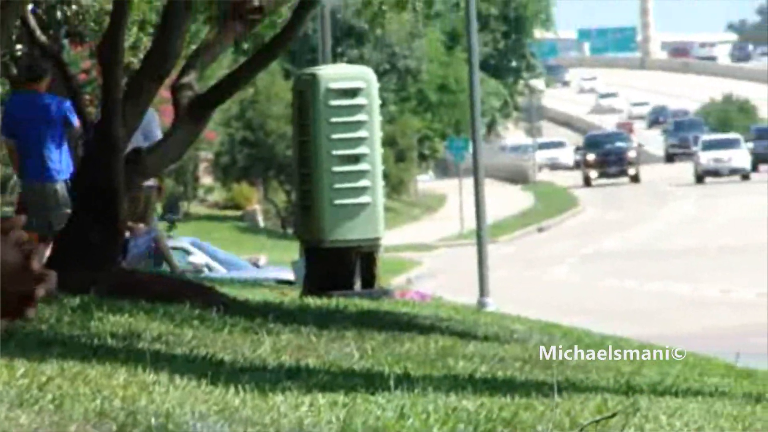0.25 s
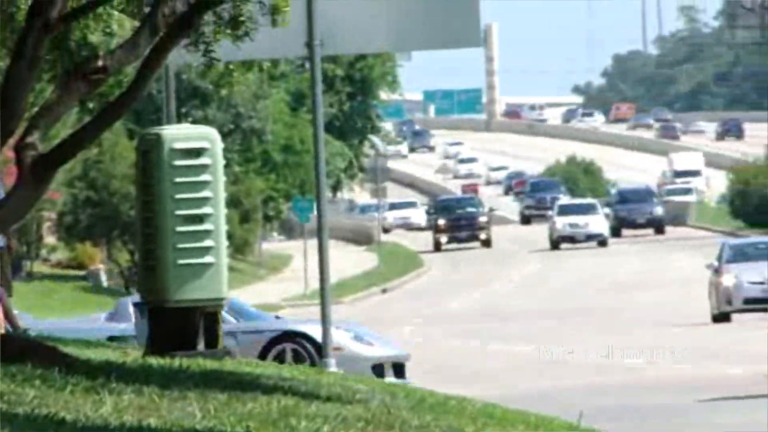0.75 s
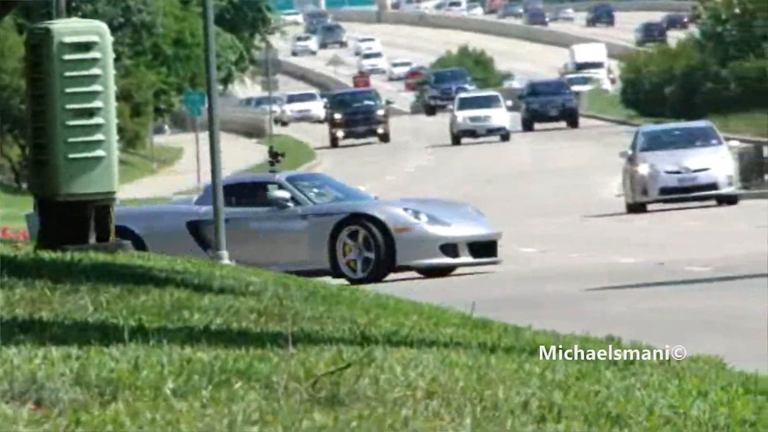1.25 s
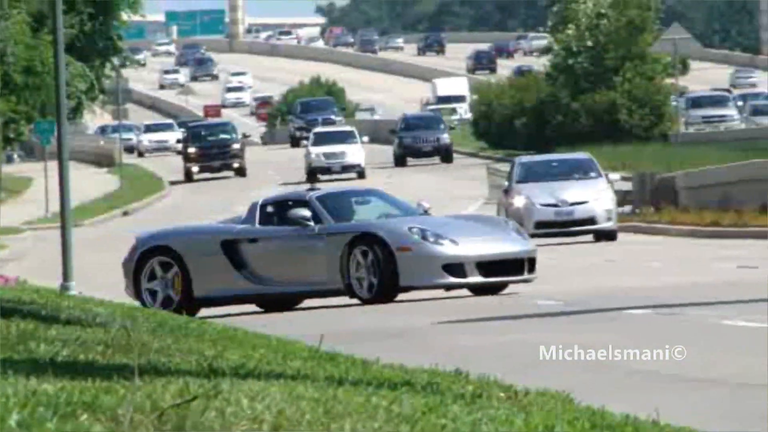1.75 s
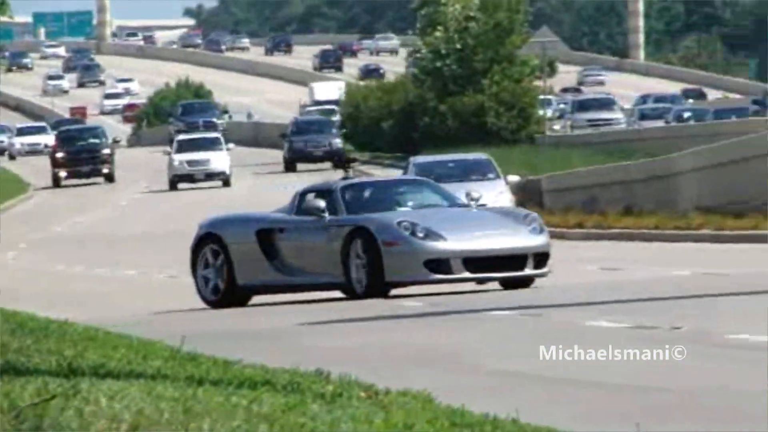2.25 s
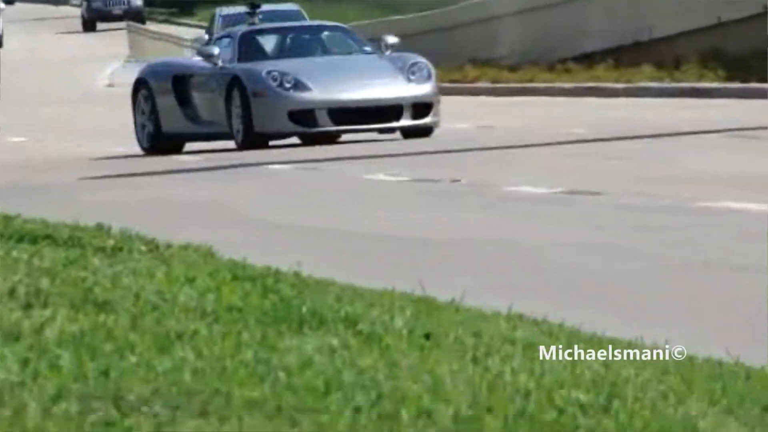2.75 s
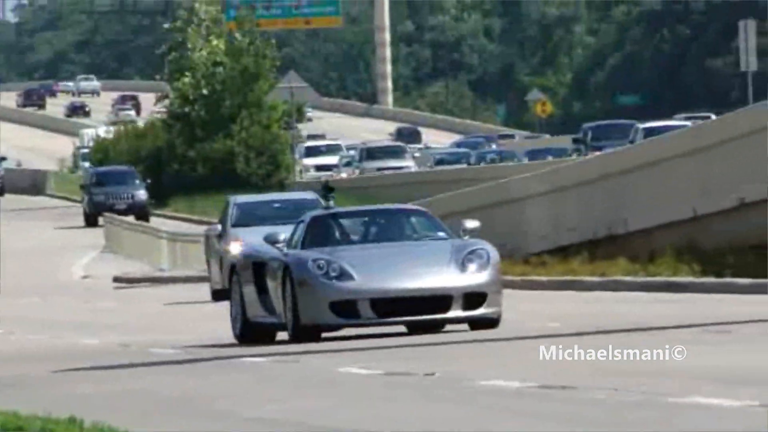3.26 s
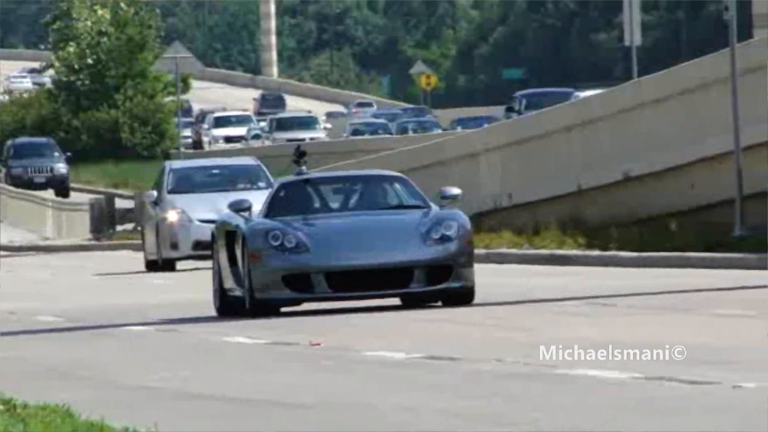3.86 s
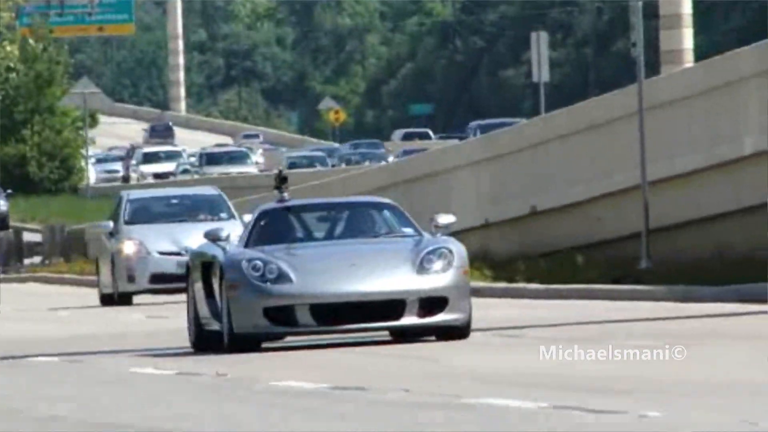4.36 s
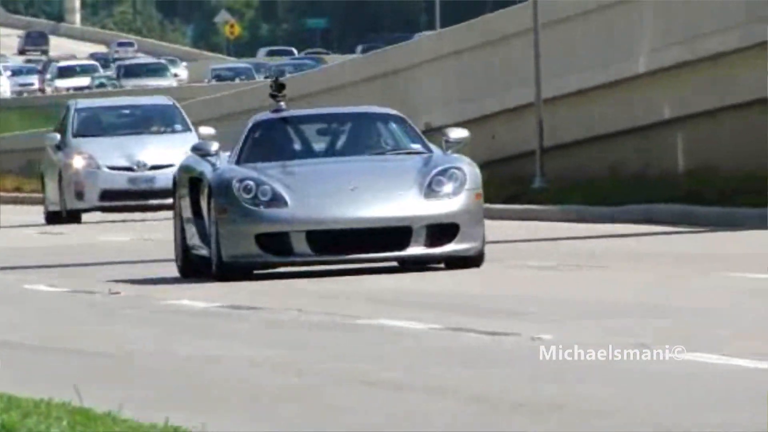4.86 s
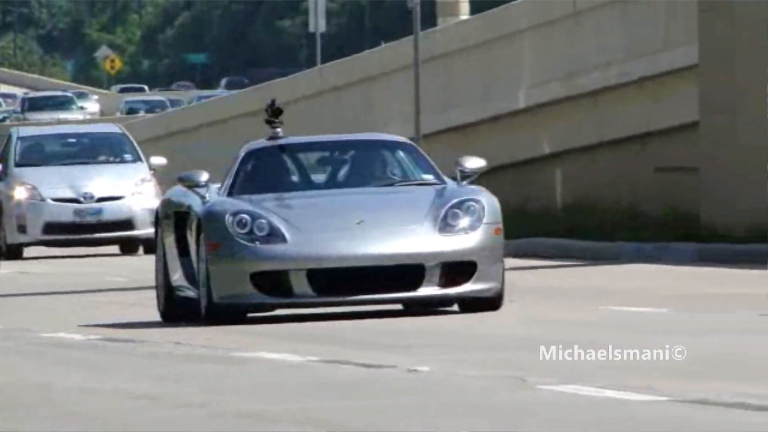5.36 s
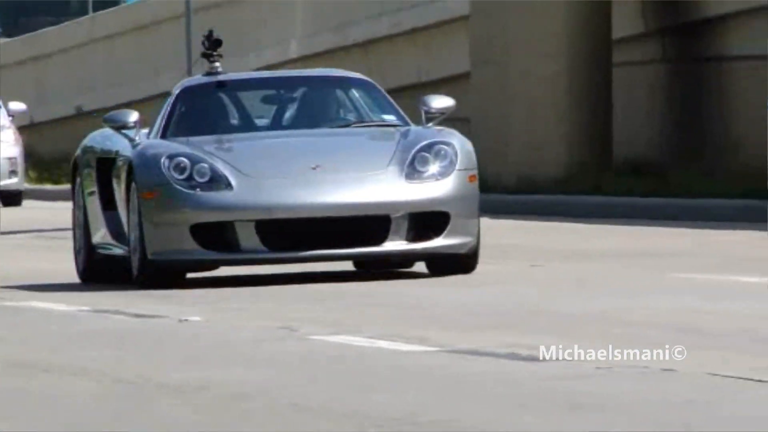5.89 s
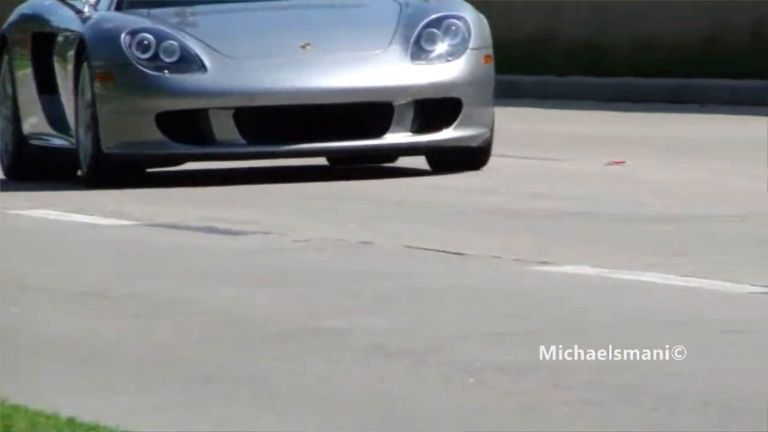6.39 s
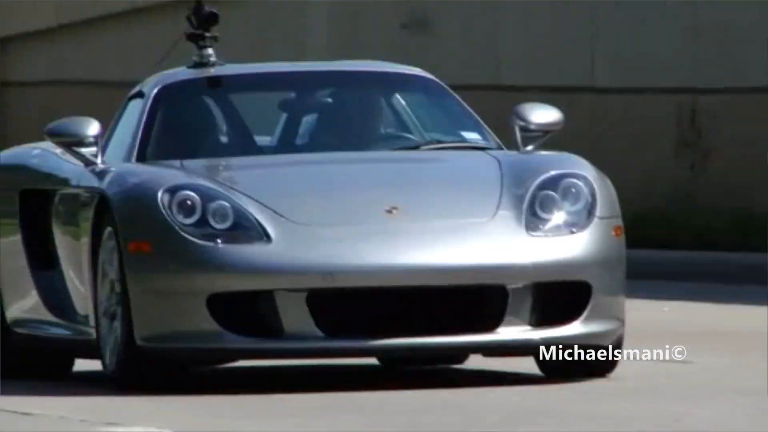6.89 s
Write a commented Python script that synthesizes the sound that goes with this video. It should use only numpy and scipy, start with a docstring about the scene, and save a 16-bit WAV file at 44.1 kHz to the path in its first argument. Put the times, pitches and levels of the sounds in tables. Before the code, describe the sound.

Busy roadside traffic hisses and swells under buffeting wind on a small camera microphone, then a sports car's engine climbs past and shifts up.

```python
"""On the grass verge of a busy road, heard through a small two-port camera microphone. Cars sweep by in swells
of shaped noise: tyre roar, sizzle and hiss. A sports car comes in as climbing sine tones and shifts up once; two
treaded tyres sing as tones mixed with narrow noise, and brief tones swell and fade. Wind is lumpy low noise and
short thumps that push the two sides in opposite directions. A small snap rings once, and a small motor whines."""
import sys
import numpy as np
from scipy import signal
from scipy.fft import rfft, irfft, next_fast_len
from scipy.io import wavfile
from scipy.ndimage import uniform_filter1d, map_coordinates

SR = 44100
rng = np.random.default_rng(int(sys.argv[2]) if len(sys.argv) > 2 else 0)


def output_pcm(signal):
    """Save a mono or channel-first signal as 16-bit PCM at the path in sys.argv[1].

    Samples are clipped to [-1, 1] before scaling.
    """
    pcm = np.clip(np.atleast_2d(signal).T, -1, 1) * 32767
    wavfile.write(sys.argv[1], SR, np.round(pcm).astype(np.int16))


N = 314433
T = np.arange(N) / SR  # time of each sample, seconds
HZ, FRAME_S, _ = signal.stft(T, SR, nperseg=512)  # pitch of each band, time of each short frame

# Passing traffic. Each row: time in seconds, tyre roar in dB, hiss above the roar in dB.
ROAD = [(0, -27.5, -18), (.15, -26, -18), (.23, -22, -19.5), (.37, -22, -17), (.5, -20.5, -17.5),
        (.9, -19, -22), (1.15, -20, -18.5), (1.275, -22, -16.5), (1.32, -29.5, -14), (1.4, -27.5, -16.5),
        (1.52, -29.5, -17.5), (1.68, -30, -21.5), (1.9, -26.5, -20.5), (2.03, -27.5, -22.5),
        (2.27, -35, -21.5), (2.63, -29, -22), (3.0, -23, -20), (3.07, -25, -21.5), (3.12, -29.5, -17),
        (3.25, -31.5, -20.5), (3.52, -25, -18.5), (3.78, -30, -17.5), (4.0, -30.5, -19), (4.3, -29, -15.5),
        (4.5, -25.5, -13), (4.63, -28.5, -11.5), (4.75, -25.5, -14.5), (4.88, -28.5, -10), (5.1, -25, -20),
        (5.27, -27.5, -16.5), (5.6, -25, -19), (5.75, -21, -22.5), (5.88, -24, -18.5), (6.15, -21.5, -22.5),
        (6.45, -23.5, -21), (6.72, -19, -21.5), (7.13, -20.5, -22)]
# Tone colours of the road layers, evened out to a common strength. Each row: pitch in Hz, relative dB per Hz.
DRONE_COLOUR = [(25, -49), (60, -54), (110, -10.5), (200, 6), (350, 0.5), (550, 2.5), (800, -3),
                (1200, -81)]
ROAR_COLOUR = [(250, -62), (500, -32), (700, 0.5), (1000, 1.5), (1300, 2.5), (1700, -2.5), (2200, -10),
               (3000, -65)]
UPPER_ROAR_COLOUR = [(1100, -39), (1350, 9), (1600, 2), (1850, 1.5), (2300, -35)]
GROOVE_COLOUR = [(700, -16), (820, -8), (930, 9), (1060, 13), (1200, -22), (1400, -49)]  # air in the tyre grooves resonates
SIZZLE_COLOUR = [(1200, -61), (1700, -2.5), (2100, -3.5), (2500, -3), (2900, -6), (3600, -10),
                 (4300, -18.5), (5500, -52)]
HISS_COLOUR = [(3000, -43), (3900, -5.5), (4400, -2.5), (5500, -5), (7000, -9.5), (9000, -13), (10800, -15),
               (11700, -20.5), (12300, -44)]
# Layer levels over time. Each row: time in seconds, level in dB above the roar.
GROOVE_SHARE = [(0, -1), (.2, -1), (.4, -6), (.7, -6.5), (1, -6), (1.3, -3.5), (2.4, -6), (4, -2.5),
                (4.5, -9), (5.1, -19), (6, -19), (6.5, -6), (7.13, -24)]
UPPER_SHARE = [(0, -6), (1.3, -14), (4.6, -32), (5.15, -5.5), (5.8, -5), (6.2, -12), (7.13, -9)]
SIZZLE_SHARE = [(0, -7.5), (1.3, -9.5), (2.4, -9), (3.7, -7), (4.6, -5), (4.9, -7.5), (5.2, -4.5),
                (5.75, -4), (6.2, -8), (7.13, -7.5)]  # as it is at the usual hiss
# Where most of the road noise comes from. Each row: time in seconds, bearing from 0 (ahead) to 1 (right).
BEARING = [(0, 0.49), (.5, 0.54), (.8, 0.92), (1.35, 0.5), (2.4, 0.28), (3.4, 0.38), (5.1, 0.39), (6, 0.79),
           (6.4, 0.74), (7.13, 0.61)]
# Likeness of the two sides of the road noise; the treble is nearly mono.
# Each row: pitch in Hz, likeness from 0 to 1.
ALIKE = [(80, 0.1), (260, 0.9), (700, 0.75), (1200, 0.5), (2500, 0.34), (3600, 0.47), (4300, 0.88),
         (7000, 0.89), (11000, 0.97)]
# Phase by which the right side leads the left for sound fully from the right; almost none in the treble.
# Each row: pitch in Hz, phase in radians.
LEAD = [(60, .3), (300, 0.2), (800, 1.28), (1500, 2.18), (3100, 3.77), (3700, 3.3), (4300, .1),
        (12000, .01)]
# For sound fully from the right. Each row: pitch in Hz, left minus right level in dB.
SHADE = [(100, -5), (400, 2), (600, -4.5), (1200, -1.5), (2500, -7.5), (3700, -5), (4500, -1), (8000, -0.7)]
USUAL_ROAR_DB, USUAL_HISS_DB = -26, -19.5  # levels about which the growth rules turn
DRONE_DB, DRONE_GROWS = -32.5, 0.82  # engine drone at the usual roar; dB gained per dB of roar
SIZZLE_GROWS = 0.45  # dB of sizzle gained per dB of hiss
SURGE_DB, SURGES_PER_S = 0.43, 12  # quick random swells of the whole road
# The grain of the road surface roughens the sound: swing at the usual roar, rate, growth in dB per dB of roar.
RASP_DB, RASPS_PER_S, RASP_GROWS = .55, 110, .6

# Sports car. Each row: time in seconds, firing tone in dB, one-bank tone at half the rate in dB.
ENGINE = [(5.85, -55, -55), (5.97, -31, -48), (6.15, -29.5, -46), (6.27, -31, -48), (6.34, -33, -40),
          (6.4, -32, -30), (6.66, -32, -29), (6.72, -32, -40), (6.8, -29, -38), (6.88, -29, -33),
          (6.9, -48, -30), (7.13, -45, -29)]
FIRING_HZ, CLIMB_HZ_PER_S = 352, 114  # firing rate as the engine comes in, and its climb before the upshift
SHIFT_S, GEAR_STEP = 6.89, .826  # time of the upshift, and the rate after it over the rate before

# Tread blocks of two passing tyres, a list for each. Each row: time in seconds, pitch in Hz, level in dB.
TREADS = [
    [(0, 725, -34), (.15, 720, -35), (.3, 712, -37), (.45, 688, -31), (.6, 662, -32), (.76, 632, -32),
     (.9, 610, -46)],
    [(5.2, 815, -46), (5.4, 806, -34), (5.85, 788, -31), (6.05, 776, -26), (6.15, 770, -25),
     (6.33, 760, -26), (6.55, 751, -33), (6.75, 742, -28.5), (6.9, 732, -32), (7.03, 722, -29),
     (7.07, 730, -33), (7.13, 752, -25)],
]
# One row for each tyre: share of noise from 0 to 1, waver of the line in Hz, flutter of the line in dB.
TREAD_FUZZ = [(.25, 6, 1.2), (.4, 11, 2)]
# Brief tones. Each row: time of the peak in seconds, pitch in Hz, peak in dB, swell length in seconds.
BRIEF_TONES = [(5.503, 1530, -25, 0.037), (5.64, 1320, -20, 0.031), (5.747, 1550, -21, 0.028),
               (5.812, 1690, -20, 0.022), (6.61, 1197, -17.5, 0.031), (6.693, 1316, -25, 0.029),
               (6.854, 1120, -21, .03), (6.898, 1230, -25, .025), (6.96, 1173, -25, 0.026),
               (7.032, 1473, -18.5, 0.026), (7.1, 1300, -21, .03)]

# The snap. Each row: start in seconds, base level in dB.
SNAPS = [(1.8766, -16)]
# Ringing parts. Each row: base pitch in Hz, level above the snap's in dB, time to fall 60 dB in seconds.
SNAP_RING = [(1550, 4, .03), (3050, 20, .011), (3900, 8, .006), (5000, 5, .014), (6000, 5, .009),
             (7400, 5, .01), (9900, -2, .008), (11200, 2, .012)]
# Gain of the snap at each side. Each row, left then right: gain in dB.
SNAP_SIDES_DB = [
    [-11],
    [-2],
]
SNAP_SWELL_S, SNAP_SAG_PER_S = .0014, 40  # build-up time of the ring, and the sag of its pitch factor

# Flutter of air over the port. Each row: time in seconds, level in dB before the gain of each side.
WIND = [(0, -22), (.2, -27), (.5, -29), (.62, -43), (.9, -29), (1.2, -26), (1.3, -18.5), (1.6, -22),
        (1.8, -25.5), (2.15, -23), (3.3, -24), (3.42, -28), (3.6, -22.5), (4.3, -21.5), (4.9, -23),
        (5.3, -22), (5.7, -27.5), (5.95, -25.5), (6.45, -25), (6.72, -27.5), (6.9, -25.5), (7.13, -32)]
# Moments when the flutter falls still. Each row: middle in seconds, half length in seconds.
LULLS = [(0.19, 0.025), (1.236, 0.0083), (1.404, 0.014), (1.546, 0.014), (1.766, 0.046), (2.187, 0.011),
         (3.471, 0.016), (3.825, 0.015)]
# Tone colour of the wind. Each row: pitch in Hz, relative dB per Hz.
BUFFET_COLOUR = [(25, -46), (60, -25.5), (120, -7), (200, -0.5), (300, -0.5), (450, -5.5), (700, -11.5),
                 (1100, -26.5), (2000, -37), (4000, -95.5)]
# The hardest eddies. Each row: peak time in seconds, level in dB before the gain of each side,
# length in milliseconds (stretched after the peak), pitch at the peak in Hz.
THUMPS = [(0.27, -10, 1.7, 350), (0.314, -8, 2.2, 390), (0.39, -11, 1.2, 450), (0.477, -10, 1.2, 500),
          (1.27, -9, 2.8, 410), (1.304, -4, 2.0, 430), (1.319, -8, 2.9, 290), (1.331, -8, 2.8, 350),
          (1.356, -8, 3.6, 420), (1.381, -11, 2.8, 440), (1.432, -8, 2.1, 390), (1.441, -9, 2.3, 400),
          (1.459, -11, 1.8, 410), (1.477, -9, 2.3, 410), (1.506, -11, 1.7, 360), (1.517, -9, 2.5, 360),
          (1.579, -6, 1.5, 330), (1.595, -11, 3.1, 430), (1.607, -9, 1.9, 380), (1.666, -9, 1.9, 450),
          (1.697, -11, 1.8, 380), (1.71, -11, 3.7, 310), (1.871, -11, 3.0, 360), (1.94, -9, 2.6, 370),
          (1.965, -11, 1.2, 500), (2.032, -10, 1.2, 380), (2.043, -6, 1.9, 360), (2.104, -8, 1.4, 430),
          (2.155, -10, 3.3, 350), (2.165, -11, 2.8, 350), (2.202, -10, 1.8, 490), (2.215, -9, 2.6, 330),
          (2.239, -9, 2.5, 460), (2.267, -10, 3.3, 360), (2.303, -11, 2.4, 390), (2.324, -11, 1.5, 440),
          (2.356, -9, 2.2, 320), (2.411, -10, 1.5, 410), (2.427, -10, 2.2, 320), (2.47, -11, 2.5, 280),
          (2.621, -11, 1.2, 600), (2.642, -10, 2.4, 260), (2.665, -10, 1.8, 330), (2.711, -9, 1.2, 420),
          (2.751, -11, 1.8, 270), (2.939, -11, 2.4, 400), (3.047, -10, 2.6, 270), (3.065, -8, 2.1, 330),
          (3.08, -9, 2.7, 300), (3.113, -9, 2.3, 320), (3.132, -7, 1.3, 400), (3.14, -10, 2.7, 330),
          (3.153, -8, 3.0, 330), (3.179, -8, 3.6, 420), (3.242, -8, 3.0, 330), (3.353, -9, 2.8, 300),
          (3.575, -10, 3.4, 370), (3.586, -7, 2.5, 380), (3.632, -8, 2.9, 390), (3.645, -9, 1.9, 460),
          (3.664, -7, 1.9, 360), (3.674, -11, 5.0, 340), (3.703, -5, 2.0, 400), (3.723, -10, 2.9, 370),
          (3.735, -6, 1.2, 420), (3.744, -11, 1.7, 450), (3.764, -9, 3.8, 320), (3.839, -8, 2.9, 360),
          (3.873, -8, 1.7, 660), (3.891, -8, 2.5, 440), (3.919, -6, 1.2, 540), (4.031, -7, 2.0, 360),
          (4.123, -8, 2.5, 370), (4.199, -8, 1.9, 460), (4.24, -11, 2.9, 410), (4.272, -11, 3.0, 330),
          (4.349, -9, 1.9, 380), (4.404, -10, 1.9, 340), (4.477, -9, 1.8, 340), (4.517, -11, 3.3, 630),
          (4.548, -8, 1.7, 600), (4.593, -9, 1.9, 430), (4.603, -10, 1.2, 340), (4.687, -8, 2.4, 420),
          (4.724, -6, 1.5, 420), (4.789, -10, 1.8, 480), (4.833, -8, 2.1, 390), (4.847, -10, 2.5, 310),
          (4.856, -10, 2.7, 380), (4.867, -9, 2.9, 320), (4.918, -10, 1.5, 450), (5.025, -7, 3.8, 490),
          (5.047, -11, 2.2, 340), (5.073, -10, 1.2, 410), (5.181, -5, 1.4, 480), (5.213, -10, 1.9, 480),
          (5.234, -10, 2.4, 480), (5.252, -8, 3.9, 390), (5.313, -10, 1.2, 510), (5.388, -10, 1.3, 540),
          (5.414, -8, 1.4, 500), (5.466, -7, 1.2, 420), (5.522, -11, 1.5, 590), (5.558, -8, 2.4, 330),
          (5.569, -8, 3.3, 490), (5.607, -11, 1.2, 370), (5.661, -9, 1.6, 520), (5.701, -8, 1.9, 430),
          (5.838, -10, 1.2, 370), (5.85, -9, 4.8, 370), (5.867, -10, 1.2, 420), (5.881, -7, 2.6, 340),
          (5.897, -10, 1.7, 350), (6.006, -5, 2.0, 450), (6.02, -8, 1.8, 410), (6.028, -10, 3.3, 370),
          (6.056, -9, 2.4, 370), (6.106, -11, 1.2, 470), (6.239, -8, 2.5, 340), (6.279, -10, 1.2, 460),
          (6.426, -9, 1.5, 370), (6.438, -10, 2.9, 370), (6.466, -10, 1.2, 430), (6.7, -9, 1.2, 510),
          (6.725, -10, 1.5, 500), (6.876, -9, 2.2, 350)]
GUSTY_DB = 2  # random swing of the flutter
STRAY_DB, STRAY_BASS = -11.5, 0.78  # part mostly at the right port: level; power of frequency its gain falls with
YIELD, YIELD_S = .6, .03  # the flutter gives way around a hard eddy: share, span in seconds
SOFT_PER_S, SOFT_DB, SOFT_MS = 10, 4, 2  # softer eddies: rate, middle level above the flutter, base length
EDDY_HZ, SHORTER_IS_HIGHER = 470, 0.36  # their base pitch at 1 ms; power law of pitch against length

# A small motor, perhaps the lens drive. Each row: multiple of the base pitch, level in dB before the run level.
MOTOR = [(1, -48), (2, -39), (3, -47), (6, -55)]
# Run level of the motor. Each row: time in seconds, gain in dB.
MOTOR_RUN = [(0, -16), (2.5, -13), (4.4, -7), (5.3, 0), (7.13, 1)]
MOTOR_HZ = 554.5  # base pitch
TOP_HZ = 12300  # nothing is heard above this


def amp(db):
    """Turn decibels into a plain multiplier."""
    return 10 ** (np.asarray(db) / 20)


def unit(x):
    """Scale to an average strength (root mean square) of 1."""
    return x / np.sqrt(np.mean(np.abs(x) ** 2) + 1e-20)


def along(points, hz):
    """Read a (Hz, value) table at any pitch, on a log axis."""
    f, v = np.transpose(points)
    return np.interp(np.log(hz + 1), np.log(f + 1), v)


def curves(rows, t=T):
    """Read a table over time: one curve for each column after the first."""
    s, *cols = np.transpose(rows)
    return [np.interp(t, s, c) for c in cols]


def wobble(rate):
    """A smooth random curve with `rate` random points a second."""
    knots = rng.standard_normal(int(N * rate / SR) + 4)
    return map_coordinates(knots, [T * rate])


def filtered(x, response):
    """Multiply the spectrum of x by a response that depends on pitch."""
    m = next_fast_len(N + 8192)
    spectrum = rfft(x, m) * response(np.fft.rfftfreq(m, 1 / SR))
    return irfft(spectrum, m)[..., :N]


def tone(hz, db, waver_hz, flutter_db):
    """A sine whose pitch and level shake a little."""
    level = np.sqrt(2) * amp(db + flutter_db * wobble(22))
    phase = 2 * np.pi * np.cumsum(hz + waver_hz * wobble(30)) / SR
    return level * np.sin(phase)


def inside(rows):
    """True while a table lasts."""
    return (T > rows[0][0]) & (T < rows[-1][0])


def ports(z, other):
    """Spread a sound over two sides, with phase and loudness that shift as its source moves to the right."""
    bearing, = curves(BEARING, FRAME_S)
    turn = np.arccos(np.clip(along(ALIKE, HZ), 0, 1))[:, None] / 2
    mid, side = np.cos(turn) * z, np.sin(turn) * other
    loudness = amp(np.outer(along(SHADE, HZ), bearing) / 2)
    phase_lag = np.exp(-.5j * np.outer(along(LEAD, HZ), bearing))
    tilt = loudness * phase_lag
    left, right = (mid + side) * tilt, (mid - side) / tilt
    return signal.istft(np.array([left, right]), SR, nperseg=512)[1][:, :N]


def traffic():
    """Bands of road noise that swell with the cars, with patches of random gain that vary with pitch."""
    roar, hiss = curves(ROAD, FRAME_S)
    drone = DRONE_DB + DRONE_GROWS * (roar - USUAL_ROAR_DB)
    groove = roar + curves(GROOVE_SHARE, FRAME_S)[0]
    upper = roar + curves(UPPER_SHARE, FRAME_S)[0]
    sizzle = roar + curves(SIZZLE_SHARE, FRAME_S)[0] + SIZZLE_GROWS * (hiss - USUAL_HISS_DB)
    layers = [(DRONE_COLOUR, drone), (ROAR_COLOUR, roar), (GROOVE_COLOUR, groove),
              (UPPER_ROAR_COLOUR, upper), (SIZZLE_COLOUR, sizzle), (HISS_COLOUR, roar + hiss)]
    power = sum(np.outer(unit(amp(along(colour, HZ))), amp(db)) ** 2 for colour, db in layers)

    a, b = signal.stft(rng.standard_normal((2, N)), SR, nperseg=512)[2]
    # Patches: random values smoothed over neighbouring pitches, then over time.
    field = uniform_filter1d(rng.standard_normal(a.shape), size=8, axis=0)
    field = uniform_filter1d(field, size=12, axis=1)
    patchy_db = along([(300, 0.58), (1300, 0.7), (4000, 0.87), (8000, 0.74), (12000, 2.5)], HZ)[:, None]
    surge_db = SURGE_DB * np.interp(FRAME_S, T, wobble(SURGES_PER_S))
    gain = np.sqrt(power) * amp(patchy_db * unit(field) + surge_db)
    rasp_db = RASP_DB * amp(RASP_GROWS * (curves(ROAD)[0] - USUAL_ROAR_DB))
    return ports(a * gain, b * gain) * amp(rasp_db * wobble(RASPS_PER_S))


def engine():
    """Firing tone, roughened by uneven firings; each cylinder bank alone sounds at half the rate."""
    fire_db, bank_db = curves(ENGINE)
    climb = FIRING_HZ + CLIMB_HZ_PER_S * (T - ENGINE[0][0])
    hz = climb * np.where(T < SHIFT_S, 1, GEAR_STEP)
    fire = (1 + .3 * wobble(90)) * tone(hz, fire_db, waver_hz=3, flutter_db=1)
    bank = (1 + .2 * wobble(50)) * tone(hz / 2, bank_db, waver_hz=1.5, flutter_db=1)
    return (fire + bank) * inside(ENGINE)


def tyres():
    """Tread blocks sing a fuzzy tone: a line inside a narrow band of noise."""
    sing = np.zeros(N)
    for rows, (fuzz, waver, flutter) in zip(TREADS, TREAD_FUZZ):
        hz, db = curves(rows)
        line = tone(hz, db, waver_hz=waver, flutter_db=flutter)
        noise = unit(wobble(90)) * tone(hz, db, waver_hz=20, flutter_db=0.5)
        sing += (np.sqrt(1 - fuzz) * line + np.sqrt(fuzz) * noise) * inside(rows)
    return sing


def brief_tones():
    """Short sines that swell and fade in a bell shape, with a shaky phase."""
    shake = .6 * wobble(40)
    out = np.zeros(N)
    for s, hz, db, length in BRIEF_TONES:
        bell = np.exp(-((T - s) / length) ** 2)
        out += amp(db) * bell * np.sin(2 * np.pi * hz * T + shake)
    return out


def snap():
    """A small dry snap on the right: a noise crack and a short ring, its lowest part out of step at the ports."""
    out, t = np.zeros((2, N)), np.arange(SR // 50) / SR
    pitch_factor = 1.06 - SNAP_SAG_PER_S * np.minimum(t, .004)
    for s, db in SNAPS:
        spot = out[:, round(s * SR):][:, :len(t)]  # a view: adding here adds to out
        shared, own = rng.standard_normal(len(t)), rng.standard_normal((2, len(t)))
        crack = signal.lfilter([.4, .5, .1, -.5, -.5], 1, shared + .4 * own)
        spot += amp(db - 2 - 60 * t / .016) * (1 - np.exp(-t / .0003)) * crack
        for hz, level_db, t60 in SNAP_RING:
            ring = amp(db + level_db - 60 * t / t60) * (1 - np.exp(-t / SNAP_SWELL_S))
            port_phase = [[0], [np.pi * (hz < 2000)]]
            spot += ring * np.sin(2 * np.pi * hz * t * pitch_factor + port_phase)
    return out * amp(SNAP_SIDES_DB)


def wind():
    """Lumpy turbulence and single eddies; the microphone's mixing gives the right a weaker, inverted copy."""
    still = np.prod([1 - np.exp(-((T - s) / half) ** 4) for s, half in LULLS], axis=0)
    flutter = still * amp(curves(WIND)[0] + GUSTY_DB * wobble(13))
    hard = np.bincount([round(row[0] * SR) for row in THUMPS], minlength=N)
    near_hard = np.convolve(hard, np.hanning(round(YIELD_S * SR)), "same")
    flutter = flutter * (1 - YIELD * np.clip(near_hard, 0, 1))
    lumps = amp(6.5 * np.tanh(.75 * wobble(160) + .15 * wobble(25)))  # random gain within 6.5 dB up or down

    def colour(hz):
        """Tone colour of the buffeting, as a multiplier."""
        return amp(along(BUFFET_COLOUR, hz))

    def stray_colour(hz):
        """The same colour made deeper."""
        return colour(hz) / (hz + 20) ** STRAY_BASS

    eddy = unit(filtered(rng.standard_normal(N), lambda hz: colour(hz) * hz / 300))
    push = flutter * unit(filtered(lumps * rng.standard_normal(N), colour))
    stray = flutter * amp(STRAY_DB) * unit(filtered(lumps * rng.standard_normal(N), stray_colour))
    t = np.arange(-900, 2600) / SR  # time around each peak
    for s, db, ms, hz in soft_thumps() + list(THUMPS):
        start = rng.uniform(0, 2 * np.pi)
        at = slice(round(s * SR) - 900, round(s * SR) + 2600)
        width = np.where(t < 0, ms, 1.63 * ms) / 1000  # the push dies slower than it comes
        bell = np.exp(-4 * np.log(2) * (t / width) ** 2)
        thump = bell * np.cos(2 * np.pi * hz * t * (1 - 15 * t) + start)  # falling pitch
        wake = .24 * np.exp(-np.abs(t) / np.where(t < 0, .003, .01)) * eddy[at]
        push[at] += amp(db) * (thump + wake)
    return push * np.array([[1.3], [-.67]]) + stray * np.array([[.3], [1.1]])  # left, right


def soft_thumps():
    """Lesser eddies scattered at random moments, their level following the wind of the moment."""
    when, size, length, detune = rng.uniform(size=(round(SOFT_PER_S * N / SR), 4)).T
    s = .03 + when * (N / SR - .1)
    ms = SOFT_MS * (.6 + length)
    hz = EDDY_HZ * ms ** -SHORTER_IS_HIGHER * (0.54 + detune / 2)
    db = curves(WIND, s)[0] + SOFT_DB + 8 * (size - .5)
    return list(zip(s, db, ms, hz))


def motor():
    """Thin lines at multiples of one pitch, the same in both ports."""
    lines = sum(tone(k * MOTOR_HZ, db, waver_hz=1.2, flutter_db=2) for k, db in MOTOR)
    return amp(curves(MOTOR_RUN)[0]) * lines


def scene():
    """Everything on the two sides, added up."""
    near = signal.stft(engine() + tyres() + brief_tones(), SR, nperseg=512)[2]
    return traffic() + ports(near, 0.1 * near) + snap() + wind() + motor()


def record(dry):
    """Soft overload on the loudest peaks, a bass cut against wind, nothing above the band limit."""
    soft = dry / (1 + np.abs(dry / .97) ** 6) ** (1 / 6)
    thin = filtered(soft, lambda hz: (hz / 70) ** 2 / np.sqrt(1 + (hz / 70) ** 4))  # bass cut below 70 Hz
    return filtered(np.clip(thin, -.98, .98), lambda hz: hz < TOP_HZ)


dry = scene()
out = record(dry)
output_pcm(out)
```